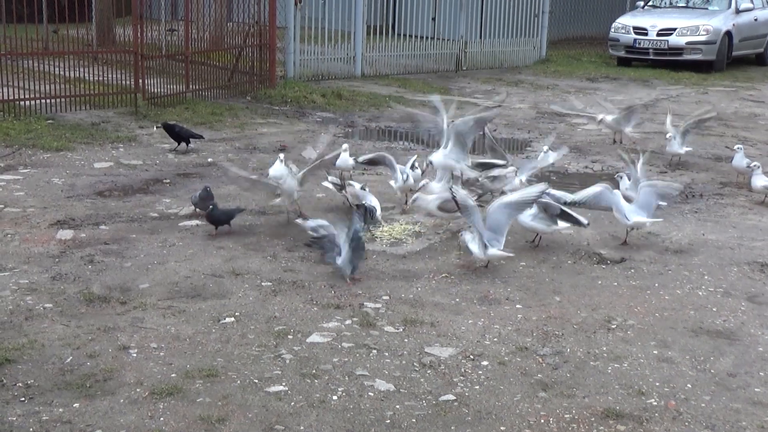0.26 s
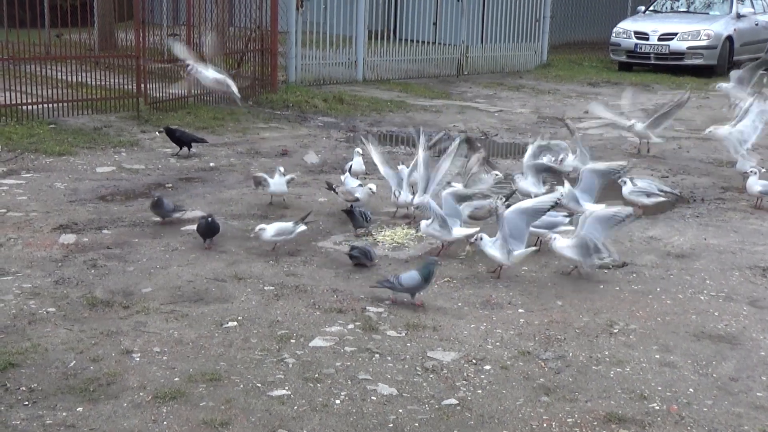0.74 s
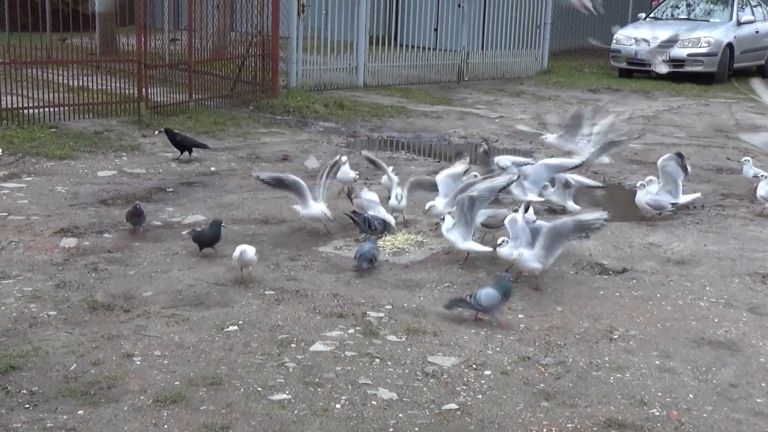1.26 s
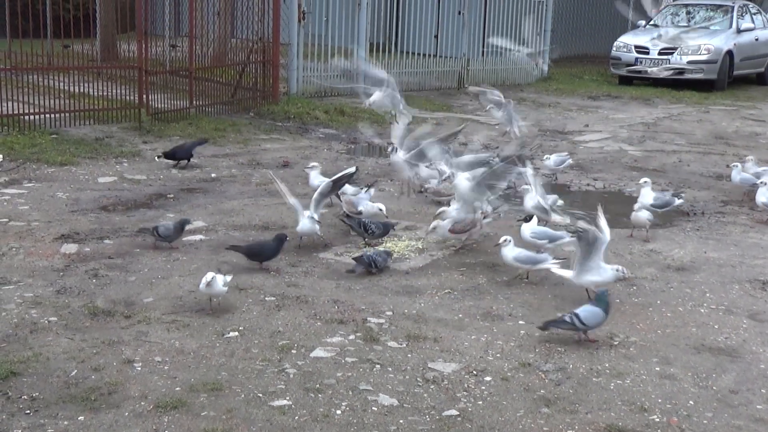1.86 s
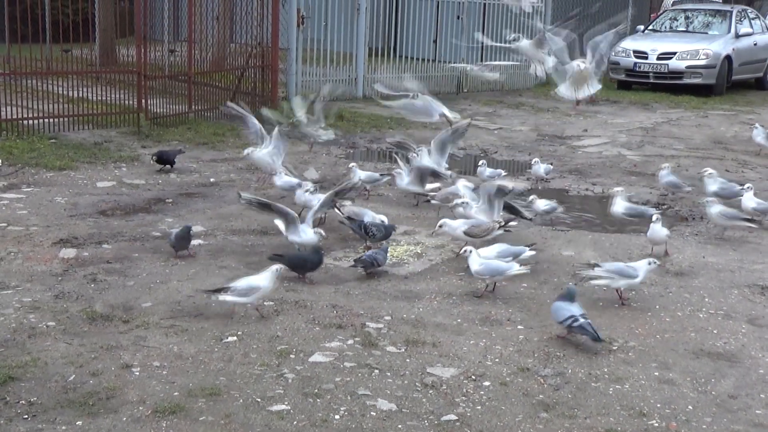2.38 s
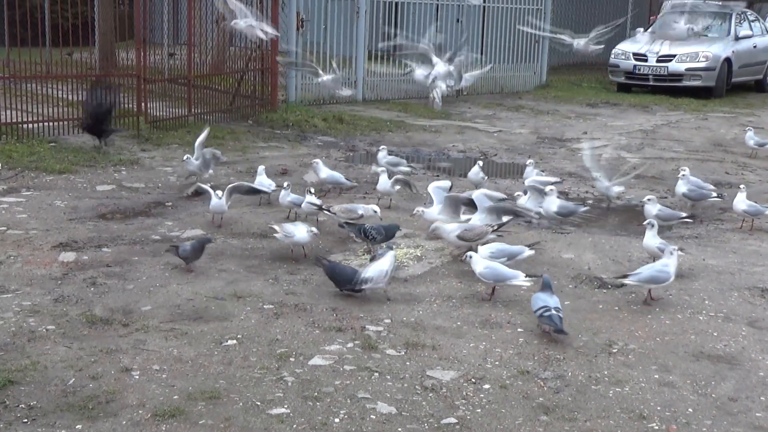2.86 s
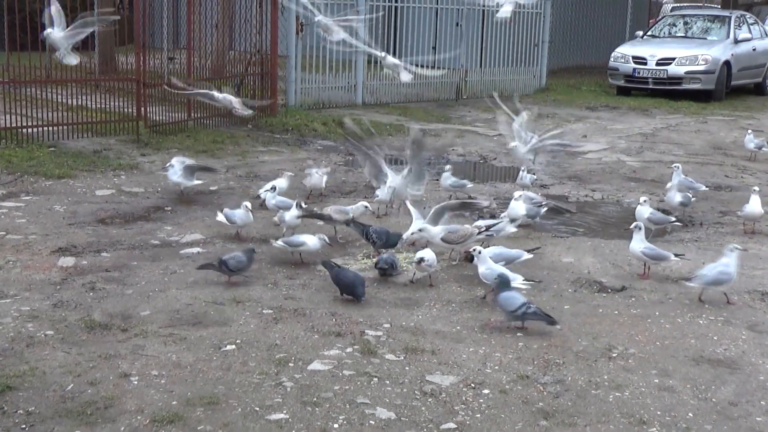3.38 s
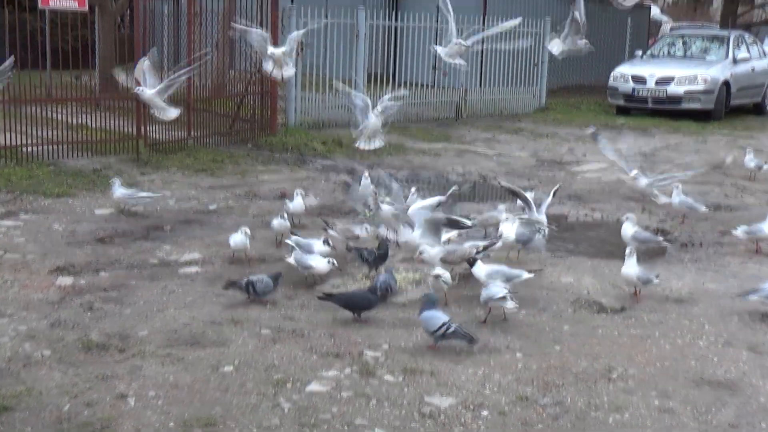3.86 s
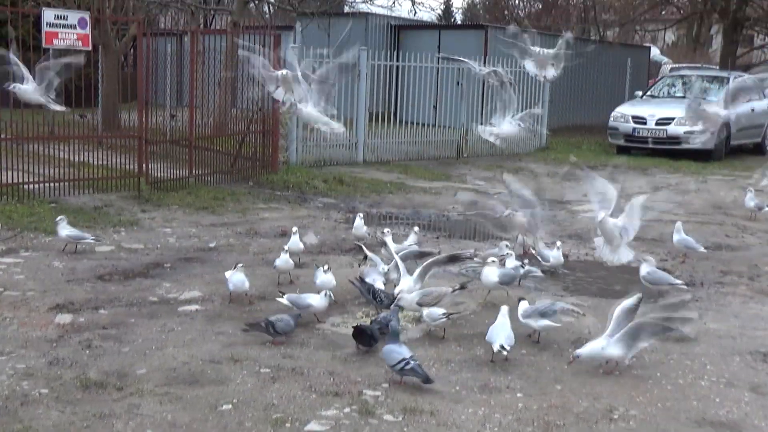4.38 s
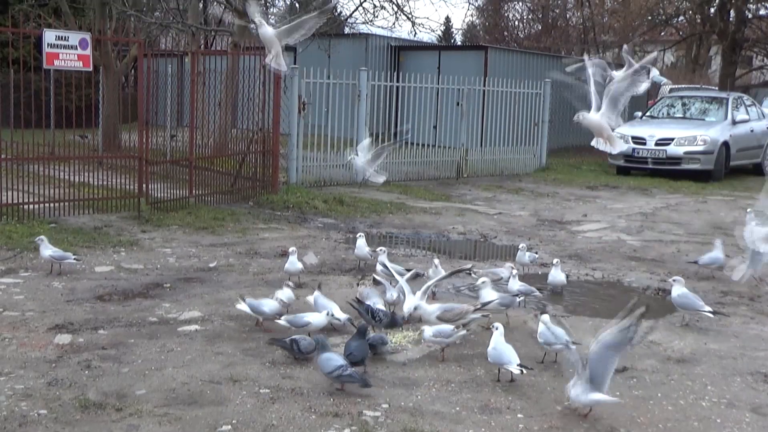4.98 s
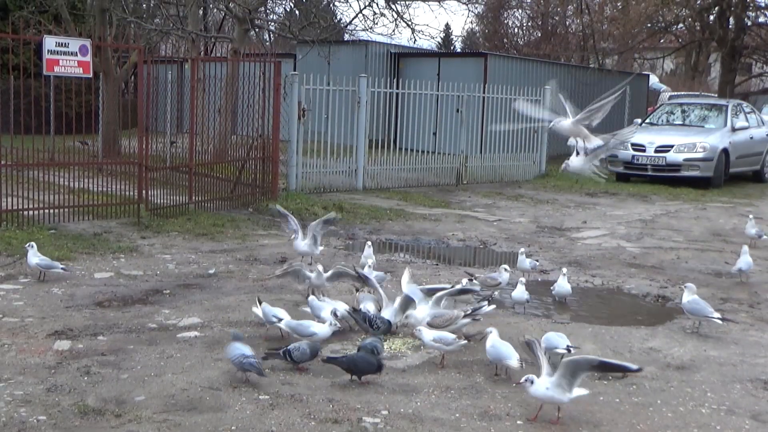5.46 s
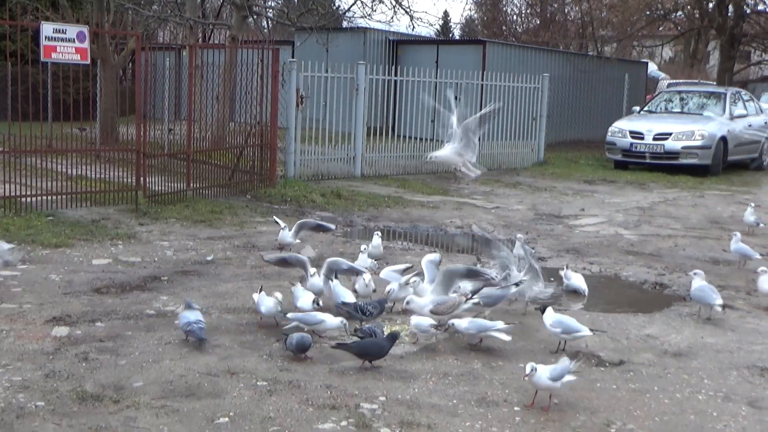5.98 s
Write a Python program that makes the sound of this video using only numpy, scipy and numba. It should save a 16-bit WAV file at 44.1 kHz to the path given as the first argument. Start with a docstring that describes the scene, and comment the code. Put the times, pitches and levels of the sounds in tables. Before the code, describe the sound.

A flock of gulls squabbles over food with harsh, overlapping squawks and chatters, wings rustling, a crow cawing twice, faint traffic far behind.

```python
"""A flock of gulls squabbles over food on open gravel between sheds, above far traffic made of flickering noise.
From the start harsh throbbing calls overlap: rough air puffs ring in moving throats and open beaks. Thin ringing
ticks come first; near 1 s a crow caws and hard clacks crack, and at 2.3 s it caws again through its own throat.
Feather noise rustles throughout, swelling near 2.7 and 4.8 s, with low puffs for strong wingbeats. Low closed-beak
muttering comes in bouts to the end, dull echoes return from the yard; a close pair of microphones, nearly mono."""
import sys
import numpy as np
from scipy import signal
from scipy.io import wavfile
from scipy.ndimage import uniform_filter1d
from numba import njit

SR = 44100
rng = np.random.default_rng(int(sys.argv[2]) if len(sys.argv) > 2 else 0)


def undo_db(level):
    """Turn decibels back into plain size, where 20 dB means ten times bigger."""
    steps = np.asarray(level, float) / 20
    return 10 ** steps


def transcribe(u):
    """Save the signal u as a 16-bit wav file named by the first command-line argument.

    u: samples, shape (n,) or (channels, n), limited to [-1, 1]; the rate is SR.
    q: integer samples, one column per channel.
    """
    v = np.clip(np.atleast_2d(u).T, -1, 1)
    q = np.round(v * 32767).astype(np.int16)
    wavfile.write(sys.argv[1], SR, q)


N = 274743   # length [samples]
LOW_SIDE_DB = -25   # unshared part of traffic and downwash at the two microphones


def rms_one(x):
    """Scale to unit rms."""
    return x / np.sqrt(np.mean(x ** 2) + 1e-20)


def in_time(rows, t):
    """Columns of a curve over time, joined by straight lines."""
    s, *columns = np.transpose(rows)
    return [np.interp(t, s, c) for c in columns]


def wobble(rate_hz, size):
    """Random wander of rms 1: noise through a double one-pole low-pass."""
    r = np.exp(-2 * np.pi * rate_hz / SR)
    settle = 3000
    noise = rng.standard_normal(size + settle)
    return rms_one(signal.lfilter([1], [1, -2 * r, r * r], noise)[settle:])


def panned(x, left_right_db):
    """Level difference between the two microphones, left over right."""
    return x * undo_db(np.array([[.5], [-.5]]) * left_right_db)


def hiss(spectrum, patchy_db, flicker_hz, side_db):
    """Half-octave bands of noise, each with its own level and flicker; rms 1."""
    edges, out = 22 * 2 ** np.arange(0, 9.6, .5), 0
    hz, db = np.transpose(spectrum)
    white = rng.standard_normal((2, 2, N))
    coarse = np.arange(N // 40 + 1)   # flicker is drawn once per 40 samples
    for k, (low, high) in enumerate(zip(edges, edges[1:])):
        band = signal.butter(2, [low, high], "band", fs=SR, output="sos")
        mid, side = signal.sosfilt(band, white[k % 2])
        level_db = np.interp(np.log(low * high) / 2, np.log(hz), db)
        flicker = np.interp(np.arange(N) / 40, coarse, wobble(40 * flicker_hz, len(coarse)))
        pair = mid + undo_db(side_db) * side * [[1], [-1]]
        out = out + undo_db(level_db + patchy_db * flicker) * pair
    return rms_one(out)


def tract(x, modes):
    """Parallel resonances of alternating sign, each applied twice for dark valleys; rms 1."""
    out = 0
    for k, (hz, width_hz, db) in enumerate(modes):
        r = np.exp(-np.pi * width_hz / SR)
        b = (1 - r * r) / 2 * np.array([1, 0, -1])
        a = [1, -2 * r * np.cos(2 * np.pi * hz / SR), r * r]
        twice = signal.lfilter(b, a, signal.lfilter(b, a, x))
        out = out + (-1) ** k * undo_db(db) * twice
    return rms_one(out)


def voice(pitch_hz, rough):
    """One air puff per cycle and turbulence gated by the cycle; roughness makes timing and size uneven."""
    n = len(pitch_hz)
    unsteady = .03 * wobble(60, n) + .045 * wobble(350, n)
    turns = np.cumsum(pitch_hz * (1 + rough * unsteady)) / SR + rng.random()
    new_cycle = np.diff(np.floor(turns), prepend=np.floor(turns[0]))
    puffs = new_cycle * undo_db(3 * rough * wobble(600, n))
    breath = rng.standard_normal(n) * (1.3 - turns % 1)   # strongest as the cycle begins
    return rms_one(puffs), rough * rms_one(breath)


# colour of the far traffic: (frequency [Hz], relative level per Hz [dB])
TRAFFIC_COLOUR = [(24, -60), (45, -13.5), (120, -7.5), (400, 3), (1000, 3.5), (2500, -12), (6000, -23)]


def traffic():
    """Far traffic: a low bed of noise whose bands drift slowly in level."""
    return undo_db(-48) * hiss(TRAFFIC_COLOUR, patchy_db=2.5, flicker_hz=1.14, side_db=LOW_SIDE_DB)


# returns from ground and shed walls: (delay [s], level [dB], left over right [dB])
WALL_ECHOES = [(.0065, -14.5, 6.5), (.021, -16, 10), (0.036, -21, 3), (0.06, -24.5, -7), (0.097, -35.5, 27)]


def yard(x):
    """Ground and shed walls return a few dull, scattered echoes from either side."""
    dull, out = signal.lfilter([.55], [1, -.45], x), np.zeros((2, N))
    for s, db, pan_db in WALL_ECHOES:
        lag = round(s * SR)
        scatter = rng.standard_normal((2, 220)) * np.exp(-np.arange(220) / 105.0)
        mid, side = [signal.fftconvolve(dull, c / np.linalg.norm(c))[:N - lag] for c in scatter]
        out[:, lag:] += undo_db(db) * panned(mid + .6 * side * [[1], [-1]], pan_db)
    return out


# colour of rustling feathers: (frequency [Hz], relative level per Hz [dB])
FEATHER_COLOUR = [(400, -37), (1500, 4.5), (3000, 2.5), (5000, -2.5), (8300, 4), (11000, -3.5),
                  (15500, -50)]
# colour of the air pushed down by wings: (frequency [Hz], relative level per Hz [dB])
DOWNWASH_COLOUR = [(110, -43), (190, -8), (290, -4), (420, -4.5), (700, -29)]
# how busily the flock flaps, as feather rustle: (time [s], level [dB])
FLAPPING_COURSE = [(0, -48), (.9, -48.5), (1.1, -47.5), (1.9, -49), (2.65, -41.5), (2.95, -47),
                   (3.25, -52.5), (3.4, -53.5), (4.4, -53.5), (4.8, -43.5), (5.4, -51), (5.6, -45),
                   (6.23, -48)]
# single strong wingbeats close by: (time [s], level [dB])
STRONG_BEATS = [(1.37, -50), (1.55, -61), (2.2, -63), (2.6, -63), (2.9, -58), (3.355, -41.5), (3.472, -42),
                (3.7, -54)]
DOWNWASH_DB = -62.5   # at mean flapping, between beats
BEAT_RISE_S, BEAT_FALL_S = 0.027, 0.029


def wings():
    """Feathers rustle as the flock flaps; each strong beat pushes a low puff of air."""
    t = np.arange(N) / SR
    rustle_db, = in_time(FLAPPING_COURSE, t)
    rustle = undo_db(rustle_db) * hiss(FEATHER_COLOUR, patchy_db=3.5, flicker_hz=14, side_db=-24)
    puffs = undo_db(DOWNWASH_DB + rustle_db - rustle_db.mean())
    for s, db in STRONG_BEATS:
        puffs = puffs + undo_db(db) * np.exp(-np.abs(t - s) / np.where(t < s, BEAT_RISE_S, BEAT_FALL_S))
    return rustle + puffs * hiss(DOWNWASH_COLOUR, patchy_db=4.0, flicker_hz=7.3, side_db=LOW_SIDE_DB)


# thin ticks, perhaps beaks on gravel: (time [s], level [dB], ring [Hz])
THIN_TICKS = [(.147, -35, 7600), (.205, -35, 8600), (.355, -33, 8100), (.363, -40, 4100),
              (0.369, -31, 3950), (3.789, -47, 9000), (3.797, -44, 8400)]


def ticks():
    """A single narrow ring that swells over three cycles and dies within a few milliseconds."""
    out, t = np.zeros(N + 400), np.arange(400) / SR
    for s, db, hz in THIN_TICKS:
        rise = t * hz / 3.0
        swell = rise * np.exp(1 - rise)
        start = round(s * SR)
        out[start:start + 400] += undo_db(db) * swell * np.sin(2 * np.pi * hz * t)
    return out[:N]


# wing tips and beaks clacking: (time [s], level [dB], ring [Hz])
HARD_CLACKS = [(0.959, -18, 7900), (0.963, -16, 7940), (0.9658, -12, 1670), (1.408, -31, 5940),
               (1.439, -34, 1200), (1.813, -15, 3600), (4.159, -37, 1900), (6.017, -20, 3100)]


def clacks():
    """A sharp crack of noise with a few cycles of ring."""
    out, t = np.zeros(N + 400), np.arange(400) / SR
    for s, db, hz in HARD_CLACKS:
        crack = .6 * rng.standard_normal(400) * np.exp(-t / .0005)
        ring = np.sin(2 * np.pi * hz * t) * np.exp(-t / 0.00031)
        start = round(s * SR)
        out[start:start + 400] += undo_db(db) * (crack + ring)
    return signal.sosfilt(signal.butter(2, [700, 13000], "band", fs=SR, output="sos"), out[:N])


# bouts of low muttering over the food: (start [s], end [s], level [dB])
MUTTER_BOUTS = [(0, 0.004, -36), (1.152, 1.28, -41), (1.486, 1.638, -39.5), (2.087, 2.175, -41),
                (2.432, 2.715, -42.5), (2.812, 2.95, -39), (3.055, 3.13, -45), (3.386, 3.478, -50),
                (3.71, 3.873, -43.5), (4.372, 4.39, -37.5), (4.603, 4.717, -41.5), (4.783, 4.928, -40),
                (5.01, 5.134, -39), (5.17, 5.252, -38), (5.3, 5.32, -58), (5.414, 5.605, -35.5),
                (5.743, 6.23, -37.5)]
MUTTER_HZ, MUTTER_FADE_DB_PER_S = 610, 210   # mean pitch; fade on both sides of a bout


def mutter():
    """Closed-beak grumbling: mostly the fundamental, wavering in pitch, in uneven throbs."""
    t, level = np.arange(N) / SR, 0
    for start, end, db in MUTTER_BOUTS:
        outside_s = np.maximum(0, np.maximum(start - t, t - end))
        level = level + undo_db(db - MUTTER_FADE_DB_PER_S * outside_s)
    waver = 1 + .07 * wobble(19, N) + 0.052 * wobble(2.8, N)
    throbs = undo_db(3.5 * np.clip(wobble(40, N), -3, 1.5))
    air = sum(voice(MUTTER_HZ * waver, 0.74)) * throbs
    return level * tract(air, [(537, 253, -5.5), (1180, 1300, -9.5)])


# resonances of the crow's throat: (centre [Hz], width of each of two passes [Hz], level [dB])
CROW_MODES = [(1207, 590, -2.5), (1670, 600, 0.5), (3200, 2300, -17.5)]
# crow caws: (start [s], length [s], pitch before bending [Hz], level before the sag [dB])
CROW_CAWS = [(0.96, 0.36, 423.4, -31.5), (2.294, .425, 422.6, -29)]
CAW_ATTACK_S, CAW_RELEASE_S = 0.0289, 0.031
CAW_EDGE_DB, CAW_SAG_DB_PER_S = -2, -17   # level change at both ends; steady sag
CAW_EDGE_DROP, CAW_DROOP, CAW_WAVER = 0.0636, .06, .012   # shares of the pitch


def crow():
    """Two long hoarse caws, lower and steadier than the gulls; the pitch climbs, wavers and droops."""
    out = np.zeros(N)
    for s, length, hz, db in CROW_CAWS:
        t = np.arange(round(length * SR)) / SR
        edge = np.clip(np.maximum(1 - t / CAW_ATTACK_S, 1 - (length - t) / CAW_RELEASE_S), 0, 1)
        tune = 1 - CAW_EDGE_DROP * edge - CAW_DROOP * (t / length) ** 4 + CAW_WAVER * wobble(15, len(t))
        air = sum(voice(hz * tune, .6)) * undo_db(1.5 * wobble(39.0, len(t)))
        level_db = db + CAW_SAG_DB_PER_S * t + CAW_EDGE_DB * edge
        out[round(s * SR):][:len(t)] = undo_db(level_db) * tract(air, CROW_MODES)
    return panned(out, 0.5)


@njit
def sliding(x, hz, r):
    """A resonance of pole radius r whose centre moves sample by sample."""
    y = np.zeros(len(x))
    for i in range(2, len(x)):
        drive = (1 - r * r) / 2 * (x[i] - x[i - 2])
        y[i] = drive + 2 * r * np.cos(2 * np.pi * hz[i] / SR) * y[i - 1] - r * r * y[i - 2]
    return y


def throat(x, hz, width_hz):
    """The moving throat resonance, applied twice; rms 1."""
    r = np.exp(-np.pi * width_hz / SR)
    return rms_one(sliding(sliding(x, hz, r), hz, r))


# THROB_SPREAD: random spread of throb rate from call to call, as a share
THROB_SPREAD, THROB_OPENS, THROB_SHUTS = .03, .2, .07   # opening and shutting as shares of the cycle


def throbbing(t, throb_hz, depth):
    """Place in the throb cycle and its gate: each throb grows, shuts abruptly and leaves a short gap."""
    turns = throb_hz * t * (1 + .03 * wobble(8, len(t))) + .04 * wobble(40, len(t))
    place = (turns + .66) % 1
    open_part = np.clip(np.minimum((place - .04) / THROB_OPENS, (.92 - place) / THROB_SHUTS), 0, 1)
    open_part = open_part * undo_db(5 * (place + 0.5))   # each throb starts weaker and grows
    gate = 1 - np.minimum(1.42 * np.clip(depth, 0, 1), .97) * (1 - open_part)
    return uniform_filter1d(place, size=120), gate * undo_db(1.5 * wobble(40, len(t)))


# beak resonances of an average bird: (centre [Hz], width of each of two passes [Hz], level [dB])
BEAK_MODES = [(3296, 1630, 20), (4005, 200, 23.5), (4230, 435, 14)]
# higher, raspy resonances of an average bird: (centre [Hz], width of each of two passes [Hz], level [dB])
RASP_MODES = [(5485, 580, 9.5), (7430, 1030, 4), (9100, 1400, 0.5), (10740, 2200, -1), (12940, 6200, -16.5)]
THROAT_WIDTH_SHARE = 0.36   # width of each throat pass as share of its median centre
RASP_PER_OPENING = 0.72   # the rasp grows as the beak opens [dB per dB]


def voiced(pitch_hz, throat_hz, gate, rough, opening_db, rasp_db):
    """Air through chest, throat and beak of one bird, from its own place in the flock."""
    puffs, breath = voice(pitch_hz, rough)
    air = gate * (puffs + 1.05 * breath)
    hoarse = gate ** 1.34 * (puffs + 1.8 * breath)   # more turbulence in the highest part
    # every bird differs a little in size, place and colour
    size, pan_db = undo_db(rng.normal(0, .25)), rng.normal(.4, 1.1)
    beak = [(f * size, w, db + rng.normal(0, 2.5)) for f, w, db in BEAK_MODES]
    rasp = [(f * size * undo_db(rng.normal(0, .3)), w, db + rng.normal(0, 3)) for f, w, db in RASP_MODES]
    chest_db = -8.0 - 14 * np.log2(np.median(pitch_hz) / 600)   # higher calls: weaker fundamental
    rasp_db = rasp_db + RASP_PER_OPENING * np.clip(opening_db, -9, 6)
    throat_sound = throat(air, throat_hz, THROAT_WIDTH_SHARE * np.median(throat_hz))
    chest_sound = undo_db(chest_db) * throat(air, pitch_hz, 1080)
    beak_sound = undo_db(opening_db) * (tract(air, beak) + undo_db(rasp_db) * tract(hoarse, rasp))
    return panned(throat_sound - chest_sound + beak_sound, pan_db)


GLIDE_SPREAD = 70   # random spread of glide from call to call [% per s]
THROAT_STRETCH = 0.31   # the throat glides further than the pitch, by this share of the glide


def arched_call(s, length, hz, throat_db, opening_db, multiple, rough, throb_hz, depth, glide, rise_share,
                rasp_db, sag):
    """One call, chopped into throbs; the pitch climbs in every throb and arches over the call."""
    half = SR // 7
    t = np.arange(-half, half) / SR
    along = np.where(t < 0, t / rise_share, t / (1 - rise_share)) / length
    swell = undo_db(-9.0 * np.abs(along) ** np.where(t < 0, 2.6, 3.6))   # builds up, ends more steeply
    throb_hz = throb_hz * (1 + THROB_SPREAD * rng.normal())
    glide = glide + GLIDE_SPREAD * rng.normal()
    throb, gate = throbbing(t, throb_hz, depth)
    arch = .08 * depth * (throb - .55) - sag * np.minimum(along ** 2, 1.5)
    pitch_hz = hz * (1 + glide / 100 * np.clip(t, -.05, .05) + arch)
    stretch = 1 + THROAT_STRETCH * glide / 100 * np.clip(t, -length, length)
    call = voiced(pitch_hz, multiple * pitch_hz * stretch, gate, rough, opening_db, rasp_db)
    return SR + round(s * SR) - half, undo_db(throat_db) * call * swell


CONTOUR_THROB_HZ, CONTOUR_RASP_DB = 67.4, -9   # mean throb rate; rasp against the beak at zero opening


def contour_call(multiple, rough, depth, course):
    """One call with a clear pitch contour, following its own course of pitch, effort and beak opening."""
    t = np.arange(round(course[0][0] * SR), round(course[-1][0] * SR)) / SR
    pitch_hz, throat_db, opening_db = in_time(course, t)
    loudest = t[np.argmax(throat_db)]
    throb_hz = CONTOUR_THROB_HZ * (1 + THROB_SPREAD * rng.normal())
    _, gate = throbbing(t - loudest, throb_hz, depth)
    edges = np.clip(np.minimum(t - t[0], t[-1] - t) / .009, 0, 1)
    call = voiced(pitch_hz, multiple * pitch_hz, gate, rough, opening_db, CONTOUR_RASP_DB)
    return SR + round(t[0] * SR), undo_db(throat_db) * edges * call


# Calls by kind, one table each: (time of the strongest throb [s], length between the points 9 dB down [s],
#   pitch before bending [Hz], throat level [dB], beak opening as level above the throat [dB])
# hoarse squawks
SQUAWKS = [(.03, .04, 758, -40.5, 4), (.252, 0.058, 1057, -35, 6.5), (1.232, 0.045, 656, -34, 7.5),
           (1.292, 0.052, 882, -36, 3), (1.617, 0.1, 705, -34.5, 3), (2.085, 0.048, 560, -45.5, 12),
           (2.805, 0.037, 789, -34.5, -3), (2.912, 0.046, 755, -33.5, -3), (3.358, 0.046, 770, -35, -5),
           (4.524, 0.044, 620, -41.5, -10.5), (4.788, 0.066, 651, -37.5, 0), (4.938, 0.067, 788, -34, 0.5),
           (5.122, 0.07, 690, -34, 2), (5.515, 0.048, 748, -34, -1), (5.782, 0.075, 770.4, -30.5, 5.5),
           (6.117, 0.053, 622, -40, 3.5), (6.222, 0.041, 720, -50.5, 14.5)]
# clearer yelps
YELPS = [(.63, 0.059, 619, -35.5, -0.5), (1.998, 0.039, 580, -38.5, -11.5), (2.594, 0.047, 862, -29.5, 0.5),
         (4.44, 0.051, 715, -44.5, -3), (5.445, 0.04, 898, -35.5, 0)]
# chatters, chopped into separate throbs
CHATTERS = [(.071, 0.045, 753, -44, 10.5), (1.033, 0.086, 821.5, -33, 4), (2.52, 0.065, 879, -36, 12),
            (2.634, 0.048, 719.5, -36, 10), (2.761, 0.069, 922, -37, 13), (2.862, 0.083, 880, -40.5, 10.5),
            (3.077, 0.058, 832, -42, 13), (3.445, 0.062, 866, -33, 2.5), (3.558, 0.043, 697, -45, 3.5),
            (3.713, 0.04, 917, -39.5, 9.5), (4.002, 0.04, 755, -49, 4.5), (4.046, 0.065, 790, -39, 0),
            (4.25, 0.055, 931, -38.5, 2.5), (4.899, 0.038, 800, -36, -6), (6.074, 0.05, 798, -42.5, 17),
            (6.162, 0.052, 1003, -27.5, -1)]
# quicker chatters
RATTLES = [(1.18, .07, 804, -38, 6.8), (3.83, 0.054, 922, -42.5, 5.1), (4.651, 0.044, 916, -36, 4.7),
           (4.703, .045, 659, -42, 8.4), (5.689, .05, 913, -36.5, 3.5)]
# screams, throat stretched up to the third harmonic
SCREAMS = [(2.275, 0.063, 792, -30.5, 5), (2.47, 0.13, 745, -39, 5), (3.387, 0.026, 633, -32, -4.5),
           (4.197, 0.056, 610, -33, -6.5), (4.585, 0.049, 823, -39, 12.5), (5.978, 0.057, 830, -31, 6)]
# thin, clean squeals with held harmonics
SQUEALS = [(1.8, .04, 635, -43, -4), (4.69, 0.04, 670, -47.5, -6)]
# barks that sweep up and stop short
WHOOPS = [(.007, 0.018, 820, -30, -1.5), (1.336, 0.04, 966, -28, -3), (1.943, 0.042, 1002, -27.5, -8),
          (2.999, 0.015, 898, -35, -4), (3.195, 0.039, 596, -38, 5.5), (4.81, 0.037, 800, -44, -11)]
# short barks that fall steeply in pitch
DROPS = [(.115, 0.04, 688, -42.5, -2), (1.452, 0.023, 937, -32.5, -30)]
# manner of each kind: (calls, throat resonance [multiples of pitch], roughness [0-1], mean throb rate [Hz],
#   throb depth [0-1, before the gate deepens it], mean glide [% per s], share of the call before its
#   strongest throb [0-1], rasp against the beak at zero opening [dB], pitch sag at both ends [share])
CALL_KINDS = [(SQUAWKS, 2.36, 0.62, 42, 0.16, 140, 0.54, -13.5, .1),
              (YELPS, 1.94, 0.42, 77, 0.11, 100, 0.52, -8.5, 0.054),
              (CHATTERS, 2.14, .45, 61, 0.73, 49, .52, -9.5, .22),
              (RATTLES, 2.24, .45, 86, .65, 53, .55, -11, .15),
              (SCREAMS, 3.17, 0.76, 81, .15, 90, .52, -13.5, .06),
              (SQUEALS, 2.33, 0.19, 36, 0.035, 60, 0.22, -5, 0.077),
              (WHOOPS, 2.34, 0.66, 77, 0.32, 650, 0.53, -11.5, .07),
              (DROPS, 1.64, 0.64, 92, 0.47, -480, 0.46, -20, 0.082)]
# calls with a clear pitch contour: (throat resonance [multiples of pitch], roughness [0-1],
#   throb depth [clipped to 0-1, then deepened by the gate],
#   course of (time [s], pitch [Hz], throat level [dB], beak opening as level above the throat [dB]))
CONTOUR_CALLS = [(2.18, 0.78, 0.1, [(.388, 636, -42, -2), (.42, 649.7, -31, -1), (.445, 710, -33, 1),
                 (.468, 764, -26.5, 0.5), (.5, 873, -26, 2), (.522, 866, -30.5, -2), (.535, 860, -47, 9)]),
                 (2.33, 0.66, -0.5, [(.752, 610, -39, 0), (.775, 632.7, -40.5, -6.5),
                 (.802, 672.5, -32, -1), (.818, 789, -30, -0.5), (.85, 696, -33.5, 0), (.86, 690, -45, 2)]),
                 (1.84, 0.34, -1, [(1.46, 659, -46, -12), (1.475, 642, -37, -13), (1.498, 610, -40.5, 2),
                 (1.52, 729, -38.5, 2), (1.55, 629, -29.5, -5)]), (3.27, .3, .5, [(1.552, 602, -27, 2),
                 (1.562, 579, -28.5, -4.5), (1.575, 537, -27, -23), (1.59, 486, -33, -11),
                 (1.597, 475, -49, -8)]), (1.46, 0.33, -0.5, [(1.838, 610, -41, -3), (1.855, 663, -42, 9.5),
                 (1.872, 768, -40, 9), (1.895, 642, -39.5, 1), (1.905, 620, -26, -1)]),
                 (2.33, 0.57, .2, [(2.1, 595.6, -44, -3), (2.115, 683.5, -30, -3), (2.128, 789, -28.5, -3),
                 (2.145, 718.5, -30, 1.5), (2.185, 689, -31.5, 2.5), (2.197, 630, -38, -4)]),
                 (2.28, 0.29, 1, [(3.302, 652, -46, -9), (3.312, 644, -38, -9), (3.335, 567, -33, -6),
                 (3.36, 548, -37.5, 5.5), (3.37, 533, -42, -4)]), (2.0, 0.2, 0, [(3.718, 470, -37, -1),
                 (3.73, 480.5, -34, -2), (3.772, 458, -41, 5.5), (3.79, 395, -53, 5),
                 (3.797, 400, -58, 2)]), (2.06, 0.55, .5, [(3.855, 553, -54, -8), (3.865, 580, -48, -5),
                 (3.89, 590, -53, -3), (3.92, 574, -44.5, -9), (3.955, 533, -44, -2)]),
                 (2.34, 0.32, -0.5, [(4.338, 568, -49, 0), (4.346, 594, -37, 5), (4.36, 689, -38.5, 0.5),
                 (4.385, 751, -39.5, 5.5), (4.41, 674, -46, 4), (4.42, 636, -54, 6)]),
                 (4.6, 0.22, 1, [(4.549, 573, -55, 0), (4.556, 583, -44, 8.5), (4.58, 599, -42, 16),
                 (4.6, 600, -32.5, 0), (4.635, 590, -42, 8), (4.645, 610, -47, 12)]),
                 (2.5, 0.34, -1.5, [(4.82, 632, -55, 2), (4.838, 647, -44, -5), (4.85, 760, -32.5, 1.5),
                 (4.868, 711, -29, -7), (4.88, 690, -34, -11)]), (2.44, 0.27, 0, [(4.995, 535, -45, 1),
                 (5.012, 682, -39, 2), (5.025, 655, -36.5, 6.5), (5.045, 770, -30.5, 3),
                 (5.062, 685, -51, -2)]), (2.67, 0.48, 0, [(5.18, 600, -48, 8.5),
                 (5.215, 660.6, -38.5, 6.5), (5.238, 735.5, -30, -0.5), (5.262, 614, -35.5, 2.5),
                 (5.275, 541, -36, -11), (5.292, 530, -45, -6)]), (2.27, 0.42, -2, [(5.372, 635, -50, 2),
                 (5.388, 702, -41.5, 4.5), (5.402, 796, -40, -2), (5.412, 826, -38, 1),
                 (5.435, 768, -38.5, 6), (5.445, 780, -47, 4)]), (4.55, 0.45, 1.2, [(5.472, 595, -35, -7),
                 (5.492, 644, -39, -1), (5.51, 641, -37.5, 3), (5.538, 530, -33, -2.5),
                 (5.546, 505, -41, 10)]), (2.46, 0.51, -1, [(5.555, 561, -39, 2), (5.58, 611.5, -42.5, 1.5),
                 (5.605, 690, -35.5, 4.5), (5.63, 665, -36.5, 1), (5.652, 637, -44, 2)]),
                 (1.88, 0.52, 0, [(5.848, 742, -32, 5), (5.862, 872, -30.5, -1.5),
                 (5.876, 984, -26.5, -0.5), (5.892, 779, -31.5, -2), (5.91, 610, -30.5, -5),
                 (5.918, 605, -50, -4)])]


def gulls():
    """Every call in the manner of its kind, together with the calls that follow their own pitch contour."""
    out = np.zeros((2, N + 2 * SR))   # a second of room on either side
    by_kind = [arched_call(*row, *manner) for rows, *manner in CALL_KINDS for row in rows]
    by_contour = [contour_call(*row) for row in CONTOUR_CALLS]
    for at, call in by_kind + by_contour:
        out[:, at:at + call.shape[1]] += call
    return out[:, SR:SR + N]


def scene():
    """Traffic, wings and muttering under the calling birds and their echoes."""
    birds = gulls() + crow() + clacks() + ticks()
    echoes = yard(birds.mean(axis=0))
    return traffic() + echoes + wings() + mutter() + birds


def top_cut(x):
    """Nothing passes above the cut-off."""
    return signal.sosfilt(signal.butter(12, 16320, fs=SR, output="sos"), x)


# the housing shades the capsules: (centre [Hz], width [Hz], share lost [0-1])
HOUSING_DIPS = [(2910, 420, 0.16), (4870, 360, 0.18), (6240, 580, 0.27)]


def record(dry):
    """The microphones' response dips in three places and a steep low-pass cuts the top."""
    for hz, width_hz, share in HOUSING_DIPS:
        dry = dry - share * signal.lfilter(*signal.iirpeak(hz, hz / width_hz, fs=SR), dry)
    mix = signal.sosfilt(signal.cheby2(12, 50, 15900, fs=SR, output="sos"), dry)   # 50 dB down at 15.9 kHz
    return top_cut(mix)


dry = scene()
out = record(dry)
transcribe(out)
```